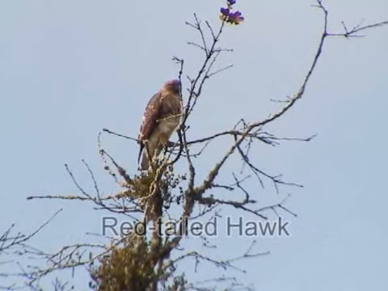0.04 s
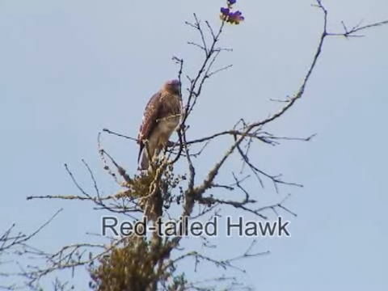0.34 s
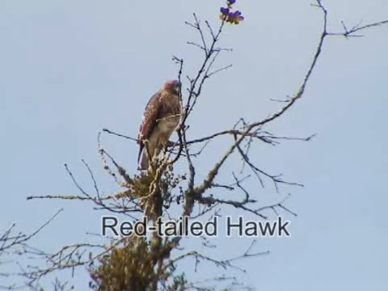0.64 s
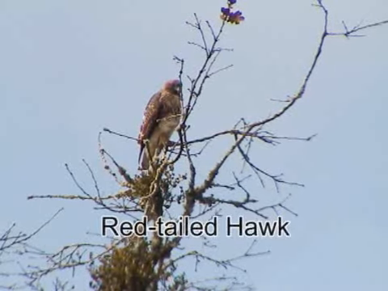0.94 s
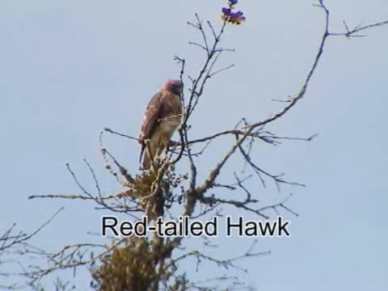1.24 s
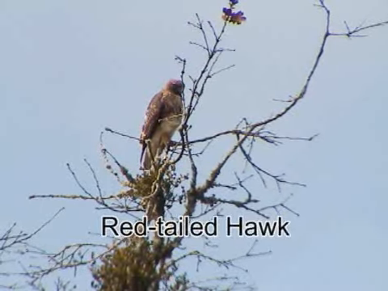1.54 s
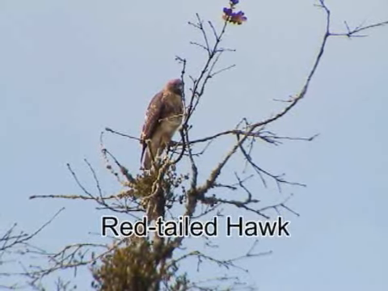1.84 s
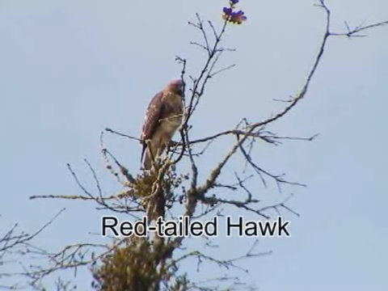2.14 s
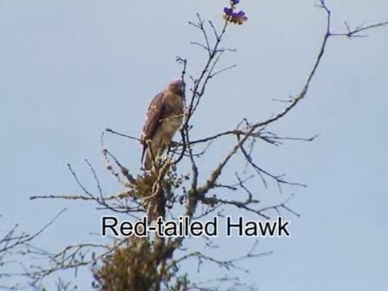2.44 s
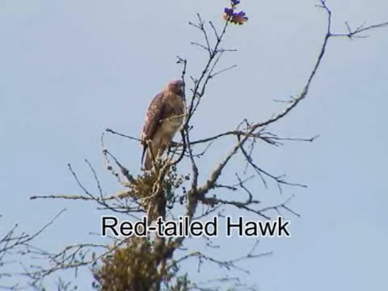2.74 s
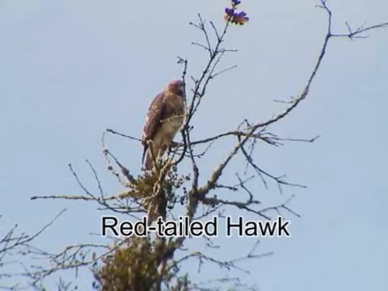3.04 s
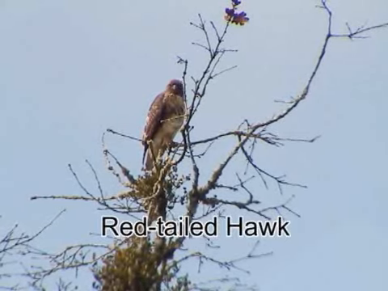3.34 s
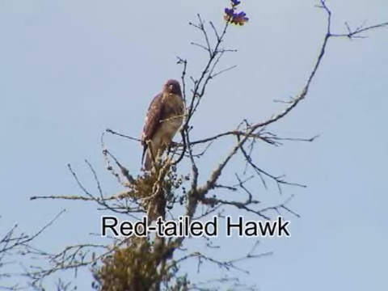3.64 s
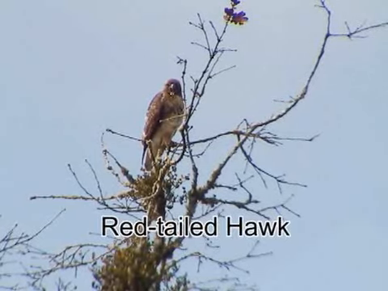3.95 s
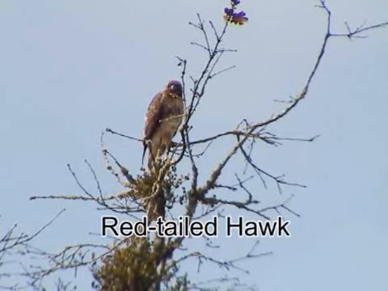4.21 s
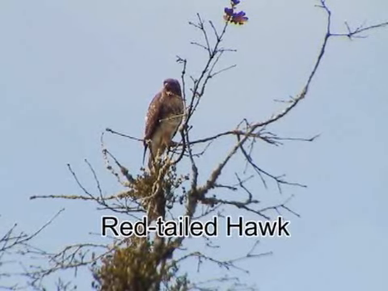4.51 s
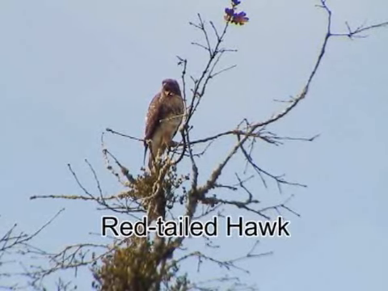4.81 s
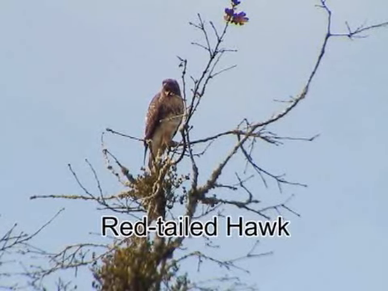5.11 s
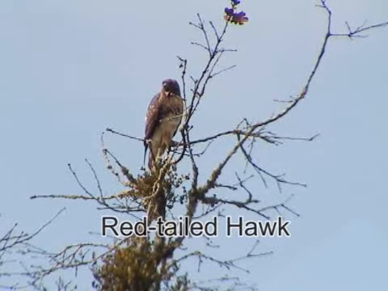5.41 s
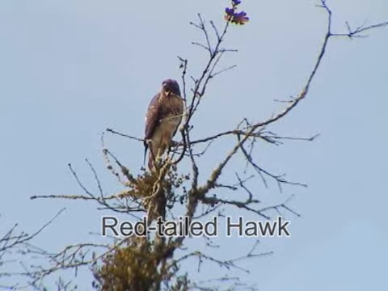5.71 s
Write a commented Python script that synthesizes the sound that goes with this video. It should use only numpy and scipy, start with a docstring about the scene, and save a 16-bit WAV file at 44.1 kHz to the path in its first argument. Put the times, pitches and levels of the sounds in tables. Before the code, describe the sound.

A hawk screams once from a treetop, the loudest and nearest sound, starting as a clear high whistle and turning harsh and raspy before fading as a hiss. Before it come faint, slurred songbird notes, a distant descending hawk call and a few dry twig ticks. After it come rapid high chips, a buzzy trill and short, far-off yelps. The distant birds echo lightly among the trees, over soft rustling and constant background hiss.

```python
"""In the woods, a hawk screams from a treetop: a puff of air, a clear membrane whistle that flips up and
back, then a hoarse rasp of slaps ringing the throat, sputtering out into a long hiss. Before it, a
songbird sings thin slurs and another hawk calls far off; a small twitter follows. A distant bird yelps.
Twigs tick and a soft low rustle comes and goes over a steady hiss."""
import sys
import numpy as np
from scipy import signal
from scipy.fft import rfft, irfft
from scipy.io import wavfile
from scipy.ndimage import uniform_filter1d, map_coordinates

SR = 44100
rng = np.random.default_rng(int(sys.argv[2]) if len(sys.argv) > 2 else 0)


def digitize_waveform(pressure):
    """Quantize a signal to 16-bit integers and store it at the path in sys.argv[1].

    Rows of a 2-D input are taken as channels; values are limited to [-1, 1].
    """
    field = np.atleast_2d(pressure).T
    bounded = np.clip(field, -1, 1)
    quanta = np.round(bounded * 32767).astype(np.int16)
    wavfile.write(sys.argv[1], SR, quanta)


N = 254456
T = np.arange(N) / SR
# The scream: air jet starts, voice flips up, returns, breaks into a rasp.
JET_S, FLIP_S, RETURN_S, BREAK_S = 3.658, 3.719, 3.761, 3.824


def amp(db):
    return 10 ** (np.asarray(db) / 20)


def unit(x):
    """Scale to rms 1."""
    return x / np.sqrt(np.mean(x ** 2) + 1e-20)


def phase_of(hz):
    return 2 * np.pi * np.cumsum(hz) / SR


def track(rows, column=1):
    """One column of a timed table at every sample."""
    rows = np.array(rows)
    return np.interp(T, rows[:, 0], rows[:, column])


def since(start_s):
    return np.maximum(T - start_s, 0)


def ramp(start_s, rise_s):
    return np.minimum(since(start_s) / rise_s, 1)


def envelope(start_s, length_s, db, fade_db, rise_s, release_s):
    """Attack, a hold that fades by fade_db (swells if negative), release."""
    release = np.exp(-np.minimum(since(start_s + length_s) / release_s, 20))
    return ramp(start_s, rise_s) * amp(db - fade_db * ramp(start_s, length_s)) * release


def add(mix, start_s, sound):
    part = mix[max(round(start_s * SR), 0):][:len(sound)]
    part += sound[:len(part)]


def wander(cutoff_hz):
    """Low-passed noise of rms 1."""
    hz = np.fft.rfftfreq(N, 1 / SR)
    return unit(irfft(rfft(rng.standard_normal(N)) / (1 + (hz / cutoff_hz) ** 4), N))


def spectrum(points):
    """Gain by frequency through (Hz, dB) points."""
    points_hz, db = np.transpose(points)
    return lambda hz: amp(np.interp(np.log(hz + 1), np.log(points_hz + 1), db))


def colour(x, gain, size=4096):
    """Causal filter shaped by gain(hz); keeps the power of white noise."""
    log_gain = np.log(np.maximum(gain(abs(np.fft.fftfreq(size, 1 / SR))), 1e-5))
    impulse = np.fft.ifft(np.exp(signal.hilbert(log_gain).conj())).real[:size // 2]
    return signal.oaconvolve(x, impulse / np.linalg.norm(impulse))[:len(x)]


def hiss(level_db=-61.5, fade_db_per_s=.28):
    """Even background hiss."""
    # Each row: frequency in Hz, relative gain in dB.
    shape = [(20, -4), (100, -1), (450, 0.5), (1400, 0), (1900, 3), (2600, -5.5), (3800, -5), (5500, -3),
             (6600, -5), (7450, -1), (8000, -7.5), (8950, -2.5), (10300, -10), (11800, -28.5)]
    gain = amp(level_db - fade_db_per_s * T + .24 * wander(24))
    return gain * unit(colour(rng.standard_normal(N), spectrum(shape)))


def low_rustle(trim_db=-2, grains_per_s=1500, clump_db=3):
    """Soft, grainy low-mid noise that swells and fades in patches."""
    # Each row: start in seconds, length in seconds, level in dB before trim.
    patches = [(0, 0.43, -69.5), (0.483, 0.31, -63), (0.723, 0.22, -61), (.92, 0.29, -56.5),
               (1.267, 0.19, -57.5), (1.459, 0.34, -58), (1.837, 0.28, -54.5), (2.107, 0.44, -56.5),
               (2.514, .66, -57), (3.197, 0.12, -56.5), (3.327, .27, -63), (3.61, .045, -56),
               (3.87, 1.3, -59.5), (5.28, 0.38, -70)]
    # Each row: frequency in Hz, relative gain in dB.
    shape = [(60, -13), (170, -6.5), (290, -10), (430, 2.5), (620, -2), (950, 0.5), (1600, -7.5),
             (2500, -2.5), (5000, -7.5), (9000, -33)]
    grains = (rng.random(N) < grains_per_s / SR) * rng.choice([-1, 1], N)
    clumps = amp(clump_db * np.tanh(wander(25)))
    power = sum(envelope(*row, fade_db=5.5, rise_s=.017, release_s=.028) ** 2 for row in patches)
    return amp(trim_db) * np.sqrt(power) * unit(colour(grains * clumps, spectrum(shape)))


def twigs(trim_db=-1, decay_s=.0064, ring_db=-7):
    """Dry ticks: a burst of splinters and a short ring of the wood."""
    # Each row: start in seconds, level in dB before trim, ring in Hz.
    ticks = [(0.483, -51, 940), (0.547, -54, 684), (0.748, -54, 427), (0.935, -52.5, 880),
             (1.129, -50, 1060), (1.665, -52, 650), (1.843, -51.5, 570), (1.959, -52, 650),
             (2.027, -50.5, 517), (2.627, -48, 855), (2.976, -53.5, 940), (3.173, -53, 560),
             (3.229, -44.5, 936), (3.239, -50.5, 424)]
    # Each row: frequency in Hz, relative gain in dB.
    crack_shape = [(88, -75), (150, -28), (385, 5), (971, 0), (1380, -3), (1690, 3), (2820, -36.5),
                   (3440, -12), (6000, -38), (7800, -60), (13200, -120)]
    out, t = np.zeros(N), T[:3000]
    decay = np.exp(-t / decay_s)
    for start_s, db, hz in ticks:
        crack = colour(rng.standard_normal(len(t)) * decay, spectrum(crack_shape))
        ring = amp(ring_db) * np.sin(2 * np.pi * hz * t) * decay
        add(out, start_s, amp(db + trim_db) * (crack + ring))
    return out


def woods(x, t60_s, wet_db, echoes_per_s=1500):
    """Add scattered echoes from trunks and branches."""
    t = T[:SR]
    taps = rng.standard_normal(SR) * (rng.random(SR) < echoes_per_s / SR)
    taps *= amp(-60 * t / t60_s) * (t > .003)
    return x + amp(wet_db) * signal.oaconvolve(x, taps / np.linalg.norm(taps))[:N]


def foliage(x):
    """Short, wavering paths through foliage make the sound twinkle."""
    delays_s = np.linspace(.002, .009, 4)
    return .8 * x + .3 * sum(np.roll(x, round(s * SR)) * wander(90) for s in delays_s)


def notes(rows, jitter_hz, buzz_hz, buzz_depth, taper, arch=.26):
    """Whistled slurs through three pitches, strongest midway; a buzz adds sidebands."""
    out, waver_hz = np.zeros(N), jitter_hz * wander(380)
    for start_s, length_s, *pitches_hz, db in rows:
        progress = np.linspace(0, 1, int(length_s * SR))
        hz = np.polyval(np.polyfit([0, .5, 1], pitches_hz, 2), progress)
        hz += waver_hz[int(start_s * SR):][:len(hz)]
        swell = signal.windows.tukey(len(hz), taper) * (1 + arch * (np.sin(np.pi * progress) - 2 / np.pi))
        add(out, start_s, amp(db) * np.sqrt(2) * np.sin(phase_of(hz)) * swell)
    return out * unit(np.exp(buzz_depth * np.sin(2 * np.pi * buzz_hz * T)))


def yelps():
    """A distant bird's short calls, each arching in pitch."""
    # Each row: start in seconds, length in seconds, middle pitch in Hz, level in dB.
    calls = [(1.305, .055, 1764, -55.5), (5.018, .03, 1837, -53), (5.295, .033, 2130, -61),
             (5.655, 0.039, 1737, -63.5)]
    rows = [(start_s, length_s, .89 * hz, hz, .93 * hz, db) for start_s, length_s, hz, db in calls]
    return notes(rows, jitter_hz=62, buzz_hz=518, buzz_depth=.57, taper=.29)


def far_hawk(trim_db=-2.5, hoarse_hz=380, core_decay_s=.85):
    """A falling scream blurred by distance: a thin core gives way to a hoarse band."""
    # Each row: time in seconds, pitch in Hz, level in dB before trim.
    cry = [(1.73, 3450, -60), (1.82, 3530, -53), (1.94, 3385, -56), (2.05, 2900, -58.5), (2.1, 2645, -52.5),
           (2.14, 2790, -59), (2.23, 2633, -51.5), (2.34, 2583, -61), (2.5, 2673, -57), (2.93, 2446, -60),
           (3.06, 2360, -72)]
    start_s, end_s = cry[0][0], cry[-1][0]
    phase = phase_of(track(cry) + 45 * wander(120))
    core = np.sin(phase) * amp(9.6 * np.tanh(wander(40)))
    hoarse = np.sin(phase) * wander(hoarse_hz) + np.cos(phase) * wander(hoarse_hz)
    core_share = .85 * np.exp(-since(start_s) / core_decay_s)
    blend = np.sqrt(core_share) * unit(core) + np.sqrt(1 - core_share) * unit(hoarse)
    gate = uniform_filter1d(((T >= start_s) & (T <= end_s)) * 1., size=130)
    return amp(trim_db + track(cry, column=2)) * gate * blend


def songbird():
    """A phrase of thin slurred notes."""
    # Each row: start and length in seconds; first, middle and last pitch in Hz; level in dB.
    slurs = [(.505, .03, 5100, 4860, 4800, -65.5), (.68, 0.076, 5200, 4230, 3450, -55.5),
             (.826, 0.042, 4450, 4660, 5690, -51.5), (.876, 0.046, 5450, 4290, 2820, -56),
             (.993, 0.044, 3480, 4040, 2970, -57.5), (1.043, 0.033, 4230, 5000, 3600, -54.5),
             (1.093, 0.03, 5800, 6020, 6200, -62), (1.195, 0.095, 6400, 4464, 3380, -54.5),
             (1.354, 0.038, 4370, 4460, 4180, -53.5), (1.382, 0.037, 4500, 5040, 6000, -55),
             (1.412, 0.044, 5820, 4500, 3200, -53.5), (1.526, 0.045, 3550, 3796, 2780, -55),
             (1.575, 0.034, 4920, 4970, 3930, -57.5), (1.634, 0.021, 6030, 6370, 6400, -60),
             (1.733, 0.037, 6500, 5590, 4950, -59.5), (1.765, 0.061, 5100, 4150, 3450, -53.5)]
    return notes(slurs, jitter_hz=80, buzz_hz=62, buzz_depth=.33, taper=.5)


def chips(first_s=5.061, gap_s=.0538, count=8, ring_hz=4600, drop_hz=2000, scatter_hz=900,
          drop_s=.0038, rise_s=.0026, decay_s=.012, click_s=.0031, spread_db=1.5):
    """The twitter's evenly spaced chips: a rough click, a fast drop in pitch, a ring."""
    out, t = np.zeros(N), T[:3000]
    noise, waver = unit(throat(rng.standard_normal(N))), wander(1200)
    attack = 2 * (1 - np.exp(-t / rise_s))
    for k, (ring_offset_db, click_offset_db) in enumerate(rng.uniform(-spread_db, spread_db, (count, 2))):
        start_s = first_s + k * gap_s
        now = slice(int(start_s * SR), int(start_s * SR) + len(t))
        hz = ring_hz + drop_hz * np.exp(-t / drop_s) + scatter_hz * waver[now] * np.exp(-t / (2 * drop_s))
        ring = amp(-54.5 + ring_offset_db) * np.sin(phase_of(hz)) * np.exp(-t / decay_s)
        click = amp(-53.5 + click_offset_db) * noise[now] * np.exp(-t / click_s)
        add(out, start_s, attack * (ring + click))
    return out


def trill(length_s=.026, glide_hz=(4900, 5414, 5600)):
    """Buzzy rising notes that end the twitter."""
    # Each row: start in seconds, level in dB.
    onsets = [(5.506, -57.5), (5.56, -58), (5.63, -58.5), (5.7, -57)]
    rows = [(start_s, length_s, *glide_hz, db) for start_s, db in onsets]
    return notes(rows, jitter_hz=302, buzz_hz=302, buzz_depth=.66, taper=.41)


def throat(x):
    """Throat resonances, sliding together as it slackens."""
    # Each row: centre and width in Hz before the slide, relative gain in dB.
    resonances = [(1214, 330, -13), (1780, 690, -12), (2346, 380, 2.5), (2590, 360, 1.5), (2926, 600, -0.5),
                  (3364, 500, -6), (4240, 820, -14.5), (4765, 520, -10.5), (6200, 1350, -23)]
    # Each row: time in seconds, factor on all frequencies.
    slide = [(3.66, 1.1), (3.75, 1.14), (3.9, 1.0), (4.3, 1.02), (4.6, .945), (5.7, .9)]

    def gain(hz):
        peaks = [amp(db) / (1 + (2 * (hz - centre_hz) / width_hz) ** 2) ** 1.2
                 for centre_hz, width_hz, db in resonances]
        return np.linalg.norm(peaks, axis=0)

    return map_coordinates(colour(x, gain), [np.cumsum(track(slide))], order=3, mode="wrap")


def membrane(hz, rough, jitter_hz, shimmer):
    """Phase and strength of one membrane; roughness (0-1) scales jitter and shimmer."""
    phase = phase_of(hz + jitter_hz * rough * wander(446))
    shake = shimmer * rough
    return phase, np.sqrt(2) * (1 + shake * wander(260)) / np.sqrt(1 + shake ** 2)


def air(flutter_db=.8, pops_per_s=160):
    """Unvoiced air: a swelling puff, a turbulent jet, a crackly hiss through the open beak."""
    # Each row of both: frequency in Hz, relative gain in dB.
    puff_shape = [(120, -55), (200, -22.5), (1040, -9), (1340, -15.5), (1460, -4), (1710, -13),
                  (2190, -4.5), (2800, 3.5), (3420, -6.5), (4590, -10.5), (8000, -35), (10400, -67),
                  (17600, -120)]
    jet_shape = [(1500, -41), (3500, 5), (5000, 2), (6000, -2), (7500, -13.5), (9800, -23), (11500, -35)]
    # Each row: start and length in seconds, level and fade in dB, rise in seconds.
    breaths = [(3.818, 1.36, -45.7, 12, .14), (5.279, .38, -60.5, 6.5, .03)]
    puff = unit(colour(rng.standard_normal(N) * amp(2 * wander(330)), spectrum(puff_shape)))
    puff *= envelope(3.617, .05, db=-55.5, fade_db=-16.5, rise_s=.007, release_s=.0054)
    jet = unit(colour(rng.standard_normal(N), spectrum(jet_shape)))
    jet *= envelope(JET_S, .165, db=-47, fade_db=4, rise_s=.02, release_s=.035)
    pops = unit((rng.random(N) < pops_per_s / SR) * (2 * rng.random(N) - 1))
    tail = unit(throat(rng.standard_normal(N) + .5 * pops) * amp(flutter_db * wander(40)))
    tail *= sum(envelope(*row, release_s=.053) for row in breaths)
    return puff + jet + tail


def rasp(slaps_per_s=245, uneven=.4, spread_db=2, surge_hz=7.2, surge_db=3, surge_peak_s=3.902,
         tone_hz=2950, tone_db=-7):
    """Membranes slap irregularly and ring the throat, air rushing between; a rough tone joins in."""
    # Each row: start and length in seconds, level in dB, pitched share of the power (0-1).
    sputters = [(4.184, .015, -44.5, .05), (4.249, .016, -46.5, .1), (4.267, .046, -45.5, 0.58),
                (4.358, .01, -43.5, 0.04), (4.386, .015, -43.5, .05), (4.414, 0.0177, -44, 0.2),
                (4.433, 0.017, -48, 0.3), (4.456, .011, -49, .05)]
    cycles = np.cumsum(slaps_per_s * np.exp(uneven * wander(250))) / SR
    slaps = np.diff(np.floor(cycles), prepend=0) * amp(spread_db * np.clip(rng.standard_normal(N), -2, 2))
    rattle = throat(unit(slaps) + .35 * rng.standard_normal(N))
    rattle /= np.sqrt(uniform_filter1d(rattle ** 2, size=480) + 1e-9)  # steady pressure evens the slaps
    surges = amp(surge_db * np.cos(2 * np.pi * surge_hz * (T - surge_peak_s)))
    rattle_gain = surges * envelope(BREAK_S, .375, db=-39.5, fade_db=10.5, rise_s=.016, release_s=.0055)
    tone_gain = amp(tone_db) * rattle_gain
    # A trace of rattle lies under the whistle.
    rattle_gain += envelope(JET_S, BREAK_S - JET_S, db=-51.5, fade_db=-1, rise_s=.006, release_s=.01)
    for start_s, length_s, db, share in sputters:
        burst = amp(db) * signal.windows.tukey(int(length_s * SR), .15)
        add(rattle_gain, start_s, np.sqrt(1 - share) * burst)
        add(tone_gain, start_s, np.sqrt(share) * burst)
    phase, strength = membrane(tone_hz, rough=.7, jitter_hz=232.7, shimmer=1.25)
    return rattle_gain * rattle + tone_gain * strength * np.sin(phase)


def squeal(pitch_hz=4830, sag_hz_per_s=900):
    """The upper register: loud at the flip, lingering faintly until the break."""
    hz = pitch_hz - sag_hz_per_s * since(FLIP_S)
    phase, strength = membrane(hz, rough=.3, jitter_hz=150, shimmer=.99)
    loud = envelope(FLIP_S, .027, db=-28, fade_db=4, rise_s=.0093, release_s=.011)
    linger = envelope(RETURN_S, BREAK_S - RETURN_S, db=-49.5, fade_db=-3, rise_s=.033, release_s=.015)
    return (loud + linger * amp(2 * wander(90))) * strength * np.sin(phase)


def whistle(trim_db=.8, flutter_db=.5, switch_s=.0094, sink_hz_per_s=2600, sink_db_per_s=55):
    """The scream's clear membrane tone: roughens at the flip and the break, then sinks and dies."""
    # Each row: time in seconds, pitch in Hz, level in dB before trim.
    cry = [(3.668, 3203, -43), (3.676, 3278, -30), (3.686, 3317, -26), (3.72, 3528, -29.5),
           (3.73, 3465, -34.5), (3.758, 3503, -36), (3.766, 3304, -26), (3.8, 3144, -34),
           (3.808, 3147, -32), (3.822, 3156, -44), (3.832, 2954, -36), (3.852, 2967, -43),
           (3.87, 2880, -38)]
    start_s, end_s = cry[0][0], cry[-1][0]
    flipped = ramp(FLIP_S, switch_s) - ramp(RETURN_S - switch_s / 2, switch_s)
    broken = ramp(RETURN_S, BREAK_S - RETURN_S) ** 3
    hz = track(cry) - sink_hz_per_s * since(end_s)
    rough = .08 * (1 - flipped - broken) + .33 * flipped + .547 * broken
    phase, strength = membrane(hz, rough, jitter_hz=233, shimmer=1.4)
    # A slower membrane beats against the tone, its rate following the pitch.
    beat = phase_of(835 + .42 * (hz - 3300) + 45 * wander(300))
    sidebands = (np.sin(phase + beat) + amp(-8) * np.sin(phase - beat)
                 + amp(-16) * np.sin(phase + 2 * beat) + amp(-15) * np.sin(2 * phase - beat))
    sidebands_db = -13 - 70 * since(start_s) - 14 * flipped
    # Overtones grow, dip in the flip and die after the break.
    overtones = np.sin(2 * phase) + amp(-27) * np.sin(3 * phase)
    overtones_db = -25 + 74.5 * (since(start_s) - since(BREAK_S)) - 13 * flipped - 190 * since(BREAK_S)
    tone = np.sin(phase) + amp(overtones_db) * overtones + amp(sidebands_db) * sidebands
    db = track(cry, column=2) + trim_db + flutter_db * wander(90) - sink_db_per_s * since(end_s)
    return ramp(start_s - .002, .002) * amp(db) * strength * tone


def scene():
    """Near hawk, birds further off among the trees, twigs, low rustle and hiss; mono."""
    hawk = woods(whistle() + squeal() + rasp() + air(), t60_s=.32, wet_db=-23)
    small_birds = songbird() + chips() + trill()
    distant = far_hawk() + yelps()
    birds = woods(foliage(small_birds) + distant, t60_s=.97, wet_db=-9)
    return (hawk + birds + twigs() + low_rustle() + hiss())[None]


def record(dry):
    """Low-pass at 12.2 kHz."""
    lowpass = signal.firwin(511, 12200, window=("kaiser", 9), fs=SR)
    return signal.oaconvolve(dry, lowpass[None], "same")


dry = scene()
out = record(dry)
digitize_waveform(out)
```